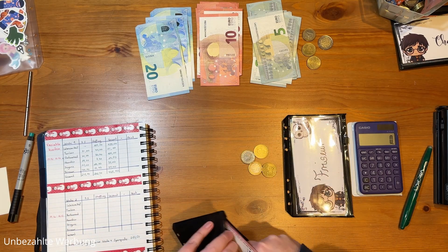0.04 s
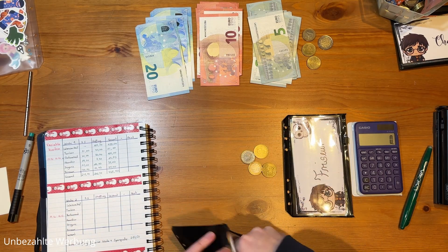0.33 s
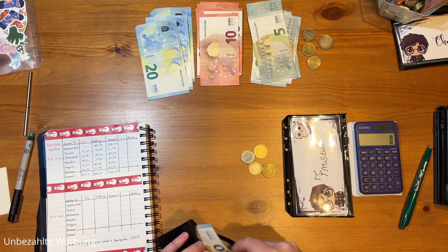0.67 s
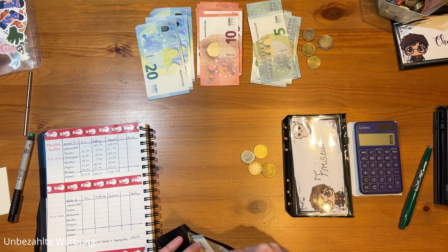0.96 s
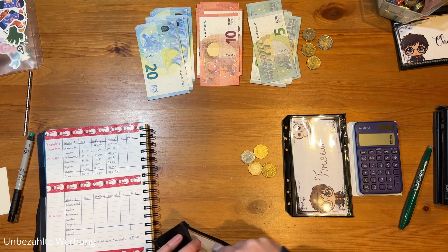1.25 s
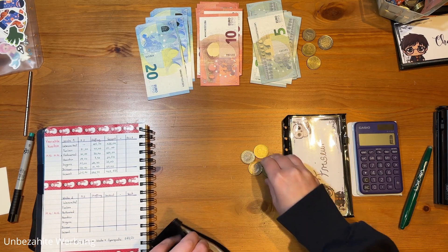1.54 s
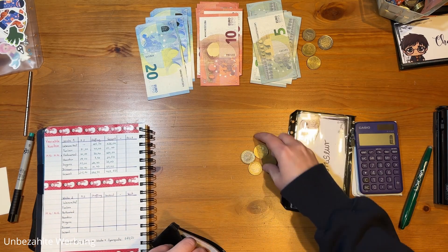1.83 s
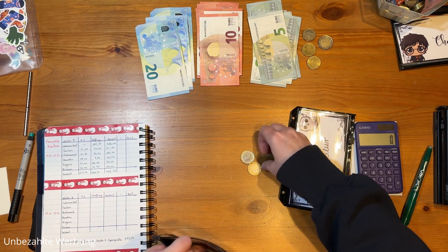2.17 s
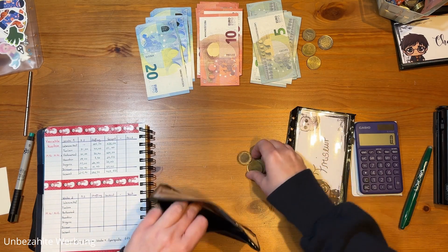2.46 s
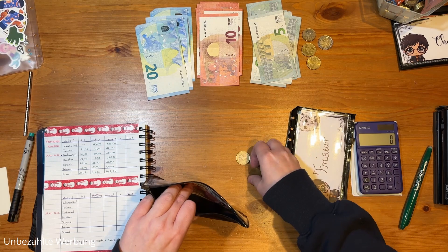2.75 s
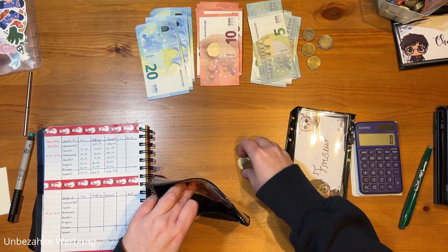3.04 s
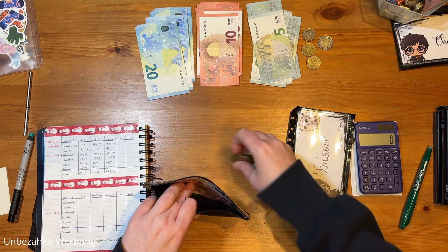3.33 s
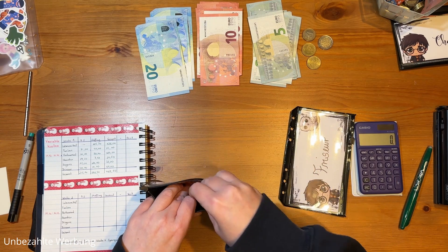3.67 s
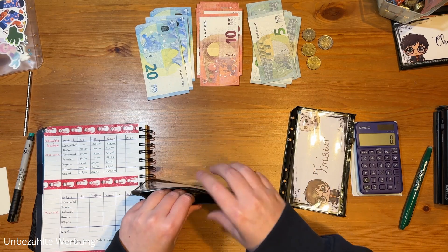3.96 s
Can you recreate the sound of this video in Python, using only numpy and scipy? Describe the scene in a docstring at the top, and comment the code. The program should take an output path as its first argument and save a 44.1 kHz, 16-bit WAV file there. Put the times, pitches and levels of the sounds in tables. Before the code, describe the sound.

Coins scrape across a wooden table, then clink into a wallet.

```python
"""Coins from table to wallet

A small, quiet room, with a stereo microphone just above a wooden table. A wallet is opened and its
notes rustle. Coins are slid over the wood, rasping on the grain, and clack as they are tipped up and
gathered in one hand. Dropped into the wallet, they knock in the pocket and ring high on each other."""
import sys
import numpy as np
from scipy import signal
from scipy.fft import rfft, irfft
from scipy.io import wavfile

SR = 44100
rng = np.random.default_rng(int(sys.argv[2]) if len(sys.argv) > 2 else 0)


def wav_out(sig):
    """Save sig, one row per channel (or a flat mono array), as 16-bit PCM at SR to the path in sys.argv[1]."""
    wavfile.write(sys.argv[1], SR, np.round(np.clip(np.atleast_2d(sig).T, -1, 1) * 32767).astype(np.int16))


N = 176400
T = np.arange(N) / SR

# the two ringing modes of each coin, by name: first_hz, second_hz
COIN_MODES = {"low": (12597, 13662), "middle": (13399, 13120), "high": (14140, 14325),
              "thin": (14240, 14900)}
# coin strikes coin: start_s, coin, ring_db, t60_s, click_db
CLINKS = [(1.927, "low", -56, 0.29, -51), (2.414, "thin", -40, 0.14, -54), (2.47, "thin", -49, 0.32, -53),
          (2.644, "thin", -47, 0.13, -42), (3.525, "thin", -26.5, 0.042, -35),
          (3.591, "high", -27, 0.12, -28.5), (3.599, "middle", -39, 0.3, -48),
          (3.614, "low", -35.5, 0.19, -40), (3.653, "thin", -38, .04, -27.5),
          (3.656, "high", -22, 0.16, -31), (3.705, "high", -22, 0.074, -19.5),
          (3.711, "thin", -13, 0.047, -21), (3.715, "middle", -13, 0.042, -17),
          (3.721, "middle", -7.5, 0.023, -45), (3.728, "thin", -32, 0.16, -24),
          (3.756, "middle", -27.5, 0.13, -50), (3.892, "high", -8.5, 0.039, -23),
          (3.892, "low", -26.5, 0.37, -33)]
# coin strikes table: start_s, crack_db, edge_db
CLACKS = [(1.877, -41.5, -47), (1.896, -40.5, -70), (1.957, -30.5, -43), (1.968, -32, -26),
          (1.974, -27, -28.5), (2.195, -73, -40), (2.203, -44, -41.5), (2.218, -47, -31.5),
          (2.4119, -27, -28.5), (2.444, -36, -30), (2.4650, -23.5, -54), (2.5328, -22.5, -40.5),
          (2.592, -29.5, -35.5), (2.6443, -23, -47), (2.6877, -29, -47), (2.729, -26.5, -45),
          (2.764, -28, -44), (2.796, -28, -41.5), (2.8224, -25.5, -37.5), (2.84, -30.5, -35),
          (2.849, -31.5, -28.5), (2.867, -42.5, -42), (3.03, -28, -27.5), (3.144, -36.5, -31.5),
          (3.154, -42.5, -40), (3.168, -66, -38), (3.193, -70, -35.5), (3.266, -80, -39.5),
          (3.319, -56.5, -46), (3.891, -33, -26)]
# bright colour of a struck metal edge: frequency_hz, level_db
EDGE_SPECTRUM = [(3000, -21.5), (7000, -8.5), (9500, 0), (11500, -12), (13000, -1), (14200, 3.5),
                 (15500, -1.5), (17000, -48)]


def clinking():
    """Coin clicks on coin and rings with a pair of modes until its neighbours or the leather damp it."""
    tones = {}
    for coin, pair_hz in COIN_MODES.items():
        first, second = np.exp(2j * np.pi * np.outer(pair_hz, T))
        tones[coin] = (first * flutter() + from_db(-8) * second * flutter()).imag
    rings = sum(from_db(db) * tones[coin] * stroke(start_s, 0, rise_s=0.00021, fall_s=t60 / np.log(1000))
                for start_s, coin, db, t60, _ in CLINKS)
    starts, _, _, _, click_db = zip(*CLINKS)
    clicks = bursts(starts, click_db, rise_s=0.00087, decay_s=0.0019) * noise(EDGE_SPECTRUM)
    return rings + clicks


def flutter(depth=0.24, bandwidth_hz=100):
    """Ringing coins keep touching, so their tone wobbles in strength and phase."""
    slow = lowpass(rng.standard_normal((2, N)), bandwidth_hz)
    return 1 + depth * (rms_one(slow[0]) + 1j * rms_one(slow[1]))


def jingling(relative_db=-16.5, t60_s=0.045):
    """Each clack and clink briefly shakes all the coins that lie together."""
    starts, contact_db = np.transpose([(row[0], row[-1]) for row in CLACKS + CLINKS])
    modes = [(hz, relative_db, t60_s) for pair_hz in COIN_MODES.values() for hz in pair_hz]
    return struck(starts, contact_db, modes, uneven_db=6)


def clacking(contact_s=0.0023, wood_db=-1.5):
    """Coins tip and drop on the table: a hollow crack, a metallic edge and the ring of the wood."""
    # colour of the crack: frequency_hz, level_db
    crack_spectrum = [(100, -49), (220, -8.5), (1400, -4.5), (3600, -2), (5700, -8.5), (8000, -21.5),
                      (11000, -35)]
    # modes of the table top: pitch_hz, level_db, t60_s
    wood_modes = [(144.2, -27.5, 0.64), (278.7, -18.5, 0.11), (377.6, -28.5, 0.32), (500, -15, 0.011),
                  (858.3, -17.5, 0.17), (1035, -25, 0.28), (1465, -17.5, 0.19), (1922, -13.5, 0.074)]
    starts, crack_db, edge_db = np.transpose(CLACKS)
    crack = bursts(starts, crack_db, contact_s, decay_s=0.0048) * noise(crack_spectrum)
    hollow = chatter(crack, starts)
    edge = bursts(starts, edge_db, contact_s, decay_s=0.004) * noise(EDGE_SPECTRUM)
    return hollow + edge + struck(starts, crack_db + wood_db, wood_modes, uneven_db=1.5)


def chatter(crack, times, bounce_hz=915, rate_spread=0.04, rebound=0.42):
    """The rim bounces rapidly on the wood, at its own rate in each clack, which makes it sound hollow."""
    out, starts = np.zeros_like(crack), (times * SR).astype(int)
    for start, end, chance in zip(starts, [*starts[1:], N], rng.standard_normal(len(starts))):
        lag = int(SR / (bounce_hz * np.exp(rate_spread * chance)))
        feedback = np.r_[1, np.zeros(lag - 1), -rebound]
        out[:, start:end] = signal.lfilter([np.sqrt(1 - rebound ** 2)], feedback, crack[:, start:end])
    return out


def sliding(resonance_width_hz=226):
    """Coins catch on the grain of the wood: a broad rasp and a resonance gliding under the fingertip."""
    # a coin slides on wood or rubs leather: start_s, length_s, rasp_db, resonance_db, from_hz, to_hz
    slides = [(1.599, 0.02, -51.5, -51.5, 650, 609), (1.709, 0.092, -57, -44.5, 1244, 816.4),
              (1.802, 0.19, -50, -53.5, 900, 883), (1.987, 0.11, -49, -68, 1257, 1420),
              (2.185, 0.043, -51.5, -45.5, 861, 777), (2.379, 0.51, -48, -53, 1017, 1035),
              (2.861, 0.074, -66, -51, 1064, 1057), (2.985, .25, -52.5, -61.5, 1103, 968),
              (3.377, 0.072, -59.5, -55, 1268, 1208), (3.741, .235, -71, -54.5, 1282, 1631)]
    # colour of the rasp: frequency_hz, level_db
    rasp_spectrum = [(60, 11.5), (300, 8.5), (600, 8), (2000, 6), (3500, -2.5), (8500, -11), (11000, -21.5),
                     (15000, -17)]
    rasp = friction(rasp_spectrum, slips_per_s=4500, spread_db=1.5)
    shake = lowpass(rng.standard_normal((2, 2, N)), resonance_width_hz)
    shake = rms_one(shake[0]) + 1j * rms_one(shake[1])  # blurs each glide into a band of noise
    pressure, resonance = 0, 0
    for start_s, length_s, rasp_db, resonance_db, from_hz, to_hz in slides:
        push = stroke(start_s, length_s, rise_s=0.012, fall_s=0.0093)
        cycles = np.cumsum(np.interp(T, [start_s, start_s + length_s], [from_hz, to_hz])) / SR
        pressure = pressure + from_db(rasp_db) * push
        resonance = resonance + from_db(resonance_db) * push * np.exp(2j * np.pi * cycles)
    return pressure * rasp + left_right(*(resonance * shake).real) / np.sqrt(2)


def rustling():
    """Notes and leather swish as the wallet is opened, and small creases give way with a crinkle."""
    # hand movements: start_s, length_s, level_db
    swishes = [(0.0, 0.32, -55), (0.333, 0.013, -45), (0.393, 0.02, -49), (0.455, 0.17, -62),
               (0.695, 0.11, -60), (0.861, 0.057, -56.5), (0.997, 0.1, -63), (1.248, 0.068, -60.5),
               (1.517, 0.051, -70)]
    # colour of rubbed notes and leather: frequency_hz, level_db
    rustle_spectrum = [(60, 0), (400, 0), (1400, -2), (4000, 1.5), (9000, 0.5), (11500, -7), (14000, -1.5)]
    handling = sum(from_db(db) * stroke(start_s, length_s, rise_s=0.018, fall_s=0.021)
                   for start_s, length_s, db in swishes)
    crinkle = from_db(-4) * pings(per_s=700, low_hz=850, high_hz=5000, t60_s=0.007)
    return handling * (friction(rustle_spectrum, slips_per_s=6000, spread_db=3.5) + crinkle)


def snapping():
    """Stiff folds in the notes and leather snap and ring briefly."""
    # a fold snaps: start_s, crack_db, ring_db
    snaps = [(0.004, -36.5, -64), (0.12, -47, -42), (0.229, -36.5, -45), (0.274, -40, -43.5),
             (0.531, -59.5, -48.5), (0.681, -46.5, -40.5), (0.898, -45, -38), (1.164, -55.5, -39),
             (1.378, -56, -57.5)]
    # colour of the snap: frequency_hz, level_db
    snap_spectrum = [(150, -3), (700, 0), (1500, -2), (2200, -5), (2900, 1.5), (3800, -0.5), (8000, -10.5),
                     (16000, -24)]
    # modes of a stiff fold: pitch_hz, level_db, t60_s
    fold_modes = [(1774, -1.5, 0.0087), (2240, -0.5, 0.006), (2847, -6.5, 0.018)]
    starts, crack_db, ring_db = np.transpose(snaps)
    cracks = bursts(starts, crack_db, rise_s=0.0021, decay_s=0.003) * noise(snap_spectrum)
    return cracks + struck(starts, ring_db, fold_modes, uneven_db=1.5)


def brushing():
    """Coins brush along the wallet's lining and jostle each other."""
    # strength of the brushing: time_s, level_db
    brush_curve = [(3.518, -57.5), (3.537, -36.5), (3.575, -59.5), (3.69, -38.5), (3.718, -28),
                   (3.75, -38.5), (3.81, -58), (3.855, -51), (3.89, -40), (3.93, -54), (3.958, -36.5),
                   (4.0, -64)]
    # colour of the leather lining: frequency_hz, level_db
    lining_spectrum = [(250, -2), (1300, -10.5), (3800, -8), (8600, -6), (11100, -6), (13500, -1.5),
                       (16000, -20.5)]
    times, db = np.transpose(brush_curve)
    envelope = from_db(np.interp(T, times, db)) * (T >= times[0])
    coin_hz = np.ravel(list(COIN_MODES.values()))
    jostle = pings(per_s=350, low_hz=coin_hz.min(), high_hz=coin_hz.max(), t60_s=0.045)
    leather = from_db(-3.5) * friction(lining_spectrum, slips_per_s=6000, spread_db=3.5)
    return envelope * (leather + jostle)


def landing():
    """Coins reach the bottom of the wallet's pocket with hollow knocks."""
    # a coin lands: start_s, level_db
    landings = [(3.531, -39), (3.6878, -31), (3.6941, -22.5), (3.711, -26.5), (3.714, -27.5), (3.734, -34),
                (3.79, -40), (3.835, -42), (3.897, -35.5)]
    # modes of the pocket: pitch_hz, level_db, t60_s
    pocket_modes = [(478, -8, 0.024), (778, -4.5, 0.013), (1103, -4, 0.036), (1310, 2.5, 0.023),
                    (2360, -2, 0.0065), (3010, -6.5, 0.0079)]
    return struck(*np.transpose(landings), pocket_modes, uneven_db=2.5)


def bumping(hardest_cutoff_hz=430, softening=0.9):
    """A hand or the wallet bumps the table; the softer the bump, the duller the thud."""
    # bumps on the table: start_s, level_db
    bumps = [(1.547, -48), (2.099, -53.5), (2.464, -42), (2.535, -44), (2.598, -43.5), (2.799, -42.5),
             (2.982, -43.5), (3.529, -43.5), (3.693, -38), (3.718, -36), (3.898, -38.5)]
    # low modes of the table: pitch_hz, level_db, t60_s
    low_modes = [(89.5, -1, .15), (125.7, -0.5, 0.22), (159.4, 0.5, 0.09), (269, 8.5, 0.036),
                 (385, 8, 0.023)]
    thuds, hardest_db = 0, max(db for _, db in bumps)
    for start_s, db in bumps:
        cutoff_hz = hardest_cutoff_hz * from_db(softening * (db - hardest_db))
        thud = struck([start_s], np.array([db]), low_modes, uneven_db=0.5)
        thuds = thuds + lowpass(thud, cutoff_hz)
    return thuds


def room(x, t60_s=0.25, first_echo_s=0.0041, build_s=0.00043, side_db=5.5):
    """Diffuse echoes come back from the near walls and die quickly."""
    # colour of the echoes: frequency_hz, gain_db
    echo_spectrum = [(100, -12), (400, 6), (1200, -5.5), (3000, -3.5), (8000, -8), (14000, -17)]
    age = T[:SR // 2]
    shape = np.clip((age - first_echo_s) / build_s, 0, 1) * np.exp(-np.log(1000) * age / t60_s)
    mid, side = rng.standard_normal((2, len(age))) / np.sqrt(2)
    diffuse = tint(left_right(mid, from_db(side_db) * side), echo_spectrum)
    echoes = diffuse * shape / np.sqrt(np.sum(shape ** 2))
    return signal.fftconvolve(x, echoes, axes=1)[:, :N]


def room_tone(hum_hz=122.7):
    """Still air and a faint hum lie under everything."""
    # colour of the still room: frequency_hz, level_db
    air_spectrum = [(20, -8), (45, -9), (125, -2.5), (220, -14.5), (1700, -24), (16000, -41)]
    return from_db(-70) * noise(air_spectrum) + from_db(-75.5) * np.sin(2 * np.pi * hum_hz * T)


def struck(times, dbs, modes, uneven_db):
    """Each blow rings every mode of a body with a strength of its own."""
    out, starts = np.zeros(N), (np.array(times) * SR).astype(int)
    for hz, db, t60 in modes:
        strengths = from_db(dbs + db + uneven_db * rng.standard_normal(len(dbs)))
        clicks = np.zeros(N)
        clicks[starts] = strengths * rng.choice([-1, 1], len(dbs))
        radius, angle = from_db(-60 / (t60 * SR)), 2 * np.pi * hz / SR
        feedback = [1, -2 * radius * np.cos(angle), radius ** 2]
        out += signal.lfilter([0, np.sin(angle)], feedback, clicks + 1e-18)
    return out


def pings(per_s, low_hz, high_hz, t60_s):
    """Tiny contacts at random moments, each ringing briefly at a pitch of its own; stereo, rms 1."""
    age, count = T[:SR // 10], int(per_s * N / SR)
    decay = np.exp(-np.log(1000) * age / t60_s)
    out = np.zeros((2, N + len(age)))
    for (when, pitch), size in zip(rng.random((count, 2)), rng.standard_normal((count, 2))):
        start, hz = int(when * N), low_hz * (high_hz / low_hz) ** pitch
        out[:, start:start + len(age)] += np.outer(size, np.sin(2 * np.pi * hz * age) * decay)
    return rms_one(left_right(*out[:, :N]))


def friction(spectrum, slips_per_s, spread_db):
    """Dense tiny slips of uneven size; stereo, rms 1."""
    sizes = from_db(spread_db * np.minimum(rng.exponential(1, N), 5))
    slipping = rng.random(N) < slips_per_s / SR
    return noise(spectrum, sizes * slipping)


def noise(spectrum, weights=1):
    """Coloured stereo noise of rms 1; uneven sample weights make it grainy."""
    mid, side = weights * rng.standard_normal((2, N))
    return rms_one(tint(left_right(mid, side), spectrum))


def bursts(times, dbs, rise_s, decay_s):
    """Envelope of blows that rise quickly and die away."""
    power, age = np.zeros(N + SR), T[:SR // 4]
    shape = np.minimum(age / rise_s, 1) * np.exp(-np.maximum(age - rise_s, 0) / decay_s)
    for start_s, db in zip(times, dbs):
        start = int(start_s * SR)
        power[start:start + len(age)] += (from_db(db) * shape) ** 2
    return np.sqrt(power[:N])


def stroke(start_s, length_s, rise_s, fall_s):
    """Envelope that rises, holds and dies away."""
    age = T - start_s
    return np.clip(age / rise_s, 0, 1) * np.exp(-np.maximum(age - length_s, 0) / fall_s)


def left_right(mid, side):
    """The two channels are alike in the bass and differ in the treble."""
    # stereo width: frequency_hz, side_gain_db
    width = [(60, -15), (200, -13.5), (500, -14.5), (1300, -2.5), (3000, -8.5), (5000, -4.5), (8500, 1),
             (14000, 2)]
    side = tint(side, width)
    return np.array([mid + side, mid - side])


def tint(x, spectrum):
    """Colour a steady signal along points of frequency_hz, gain_db."""
    hz, db = np.transpose(spectrum)
    bin_hz = np.maximum(np.fft.rfftfreq(x.shape[-1], 1 / SR), 1)
    return irfft(rfft(x) * from_db(np.interp(np.log(bin_hz), np.log(hz), db)), x.shape[-1])


def lowpass(x, cutoff_hz):
    """Second-order treble roll-off."""
    return signal.sosfilt(signal.butter(2, cutoff_hz, fs=SR, output="sos"), x)


def from_db(db):
    """Decibels to gain."""
    return 10 ** (np.asarray(db) / 20)


def rms_one(x):
    """Scale to rms 1."""
    return x / np.sqrt(np.mean(x ** 2) + 1e-20)


def scene():
    """Coins and wallet close below the microphone, with the small room around them."""
    slightly_left = from_db([[0.4], [-0.4]])
    wallet = rustling() + snapping() + brushing()
    near = (wallet + sliding() + clacking()) * slightly_left + bumping() + landing()
    ringing = clinking() + jingling()
    background = room_tone()
    return near + ringing + room(near + from_db(-8) * ringing) + background


def record(dry):
    """The deepest bass is thinned, the upper treble has a narrow dip, and the top is cut."""
    low_cut_hz, dip_hz, high_cut_hz = 53.5, 11400, 16200
    thinned = signal.sosfilt(signal.butter(2, low_cut_hz, "high", fs=SR, output="sos"), dry)
    dipped = signal.lfilter(*signal.iirnotch(dip_hz, Q=9, fs=SR), thinned)
    return signal.sosfilt(signal.ellip(10, 0.2, 70, high_cut_hz, fs=SR, output="sos"), dipped)


dry = scene()
out = record(dry)
wav_out(out)
```